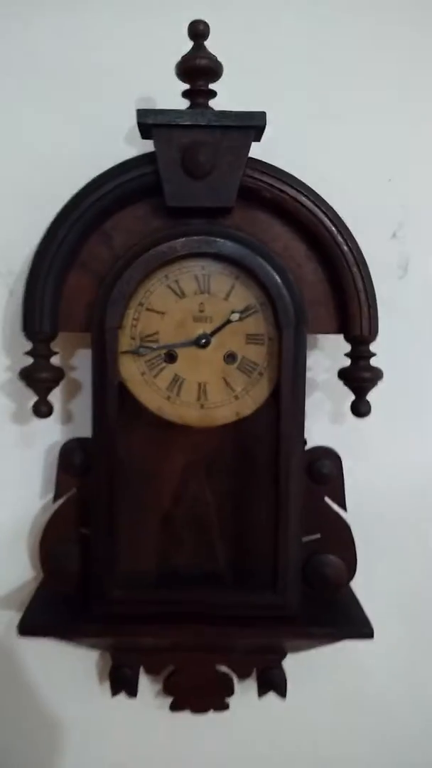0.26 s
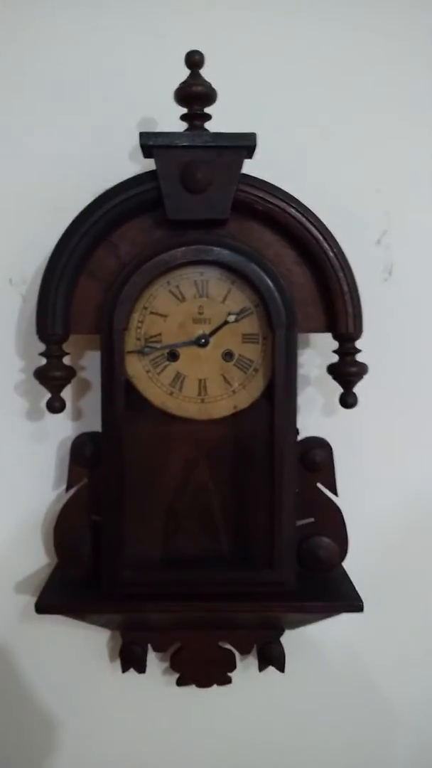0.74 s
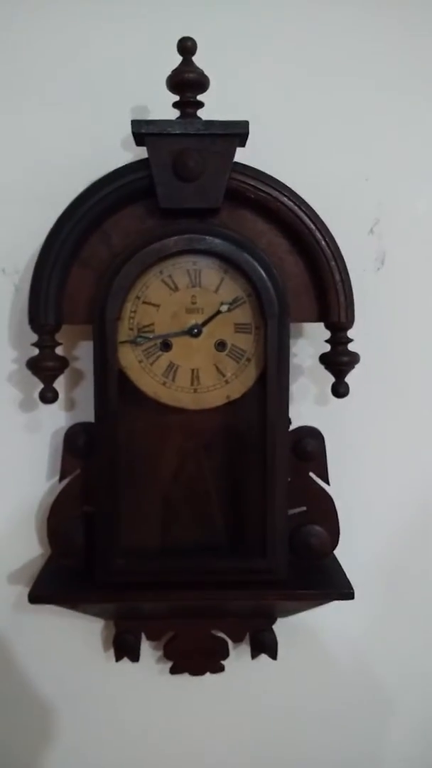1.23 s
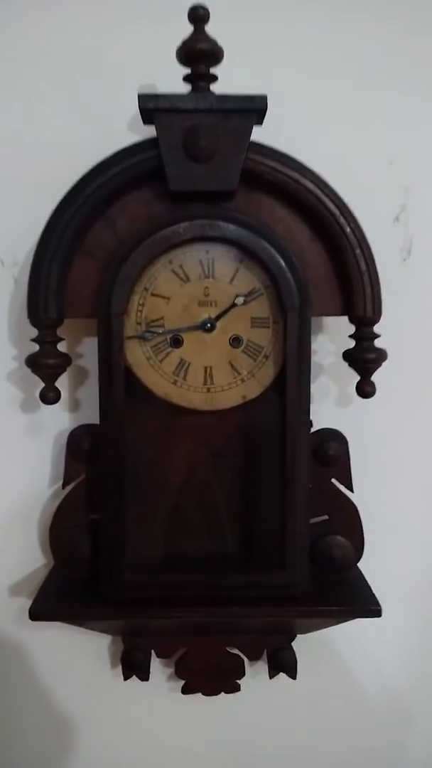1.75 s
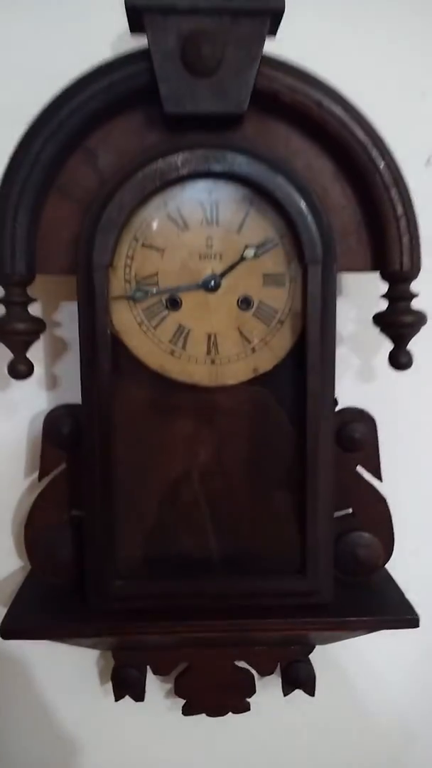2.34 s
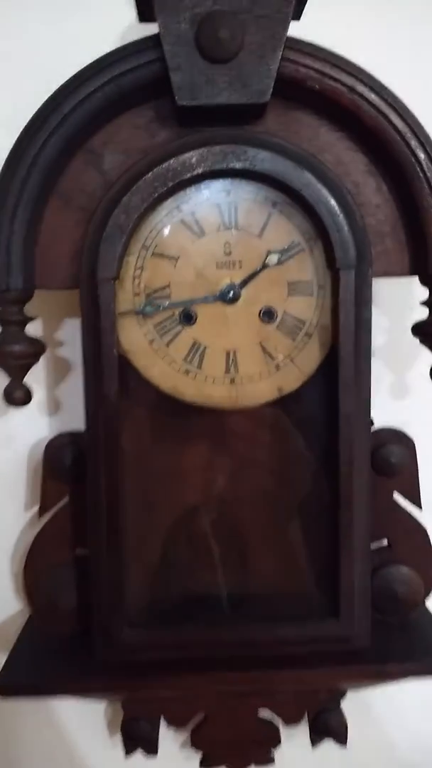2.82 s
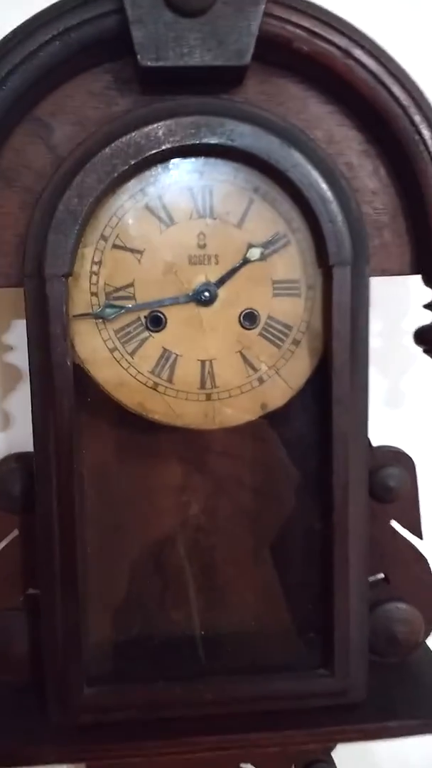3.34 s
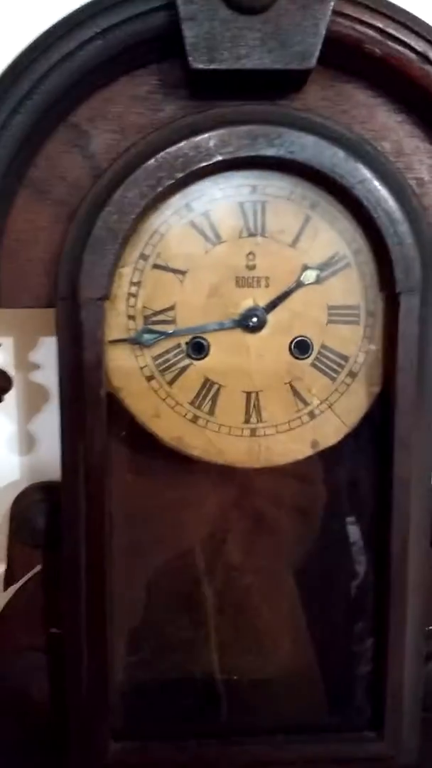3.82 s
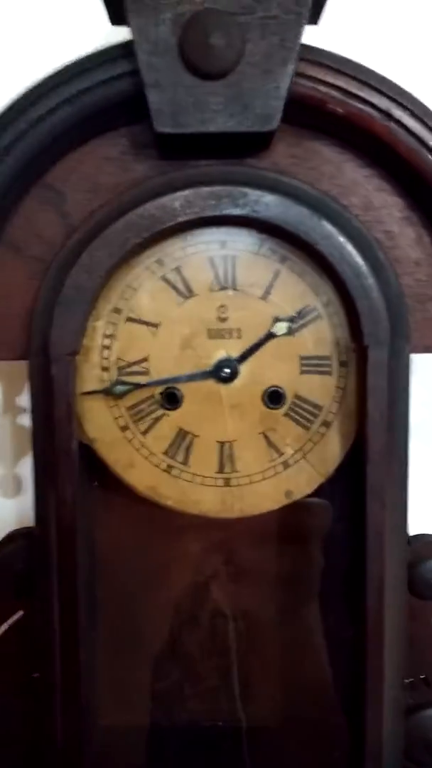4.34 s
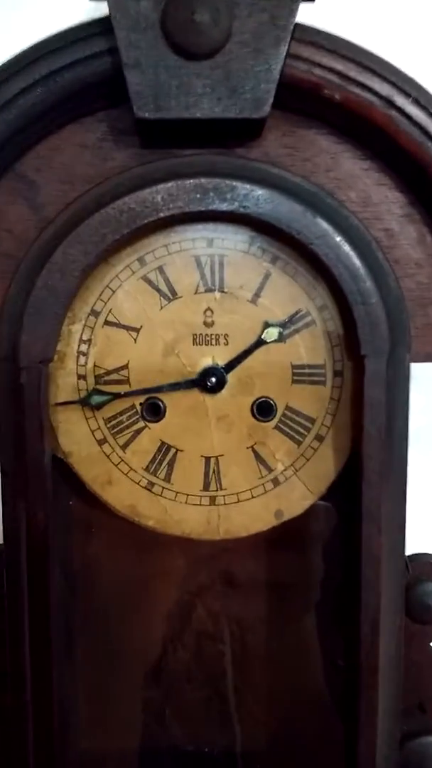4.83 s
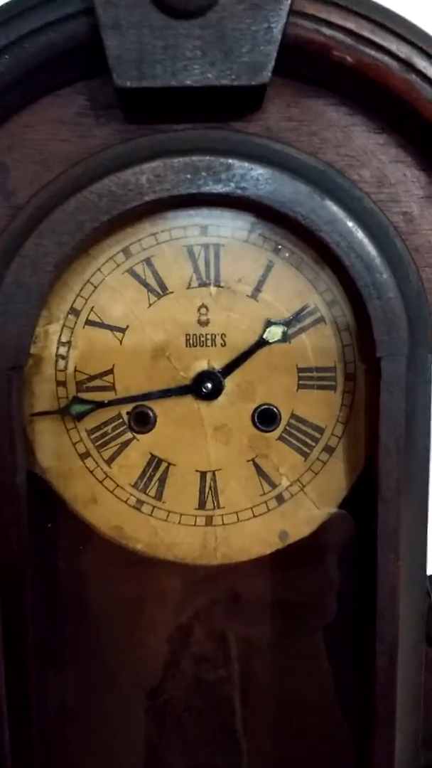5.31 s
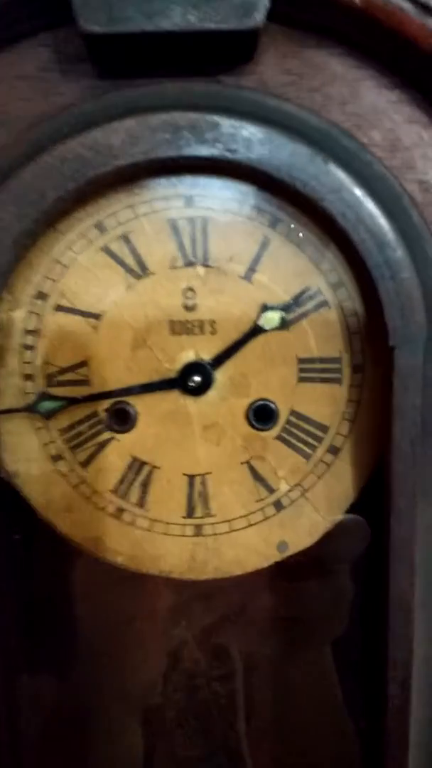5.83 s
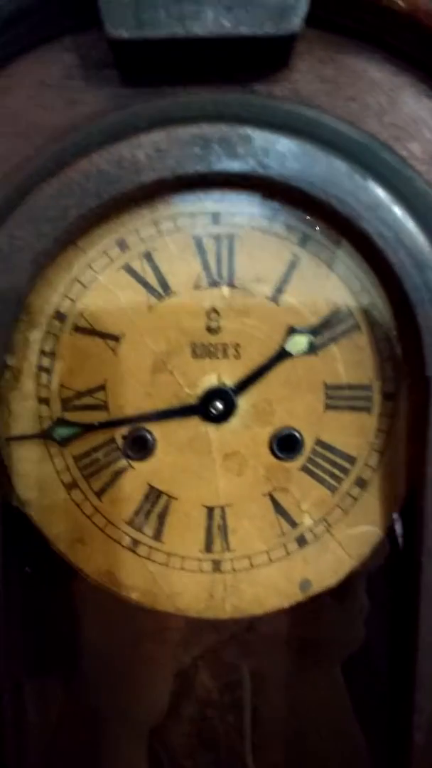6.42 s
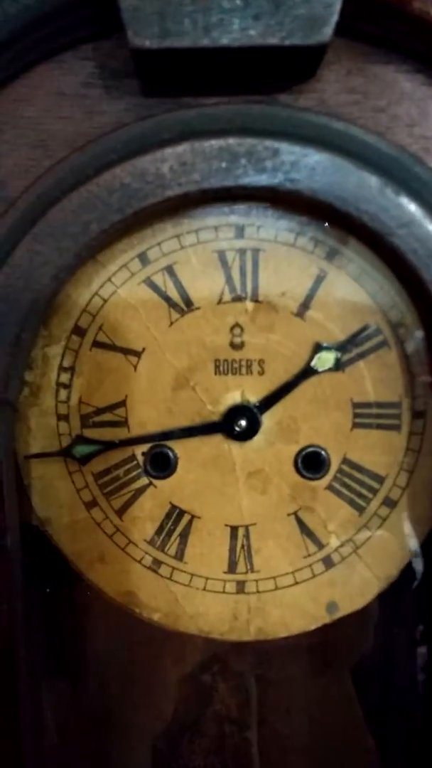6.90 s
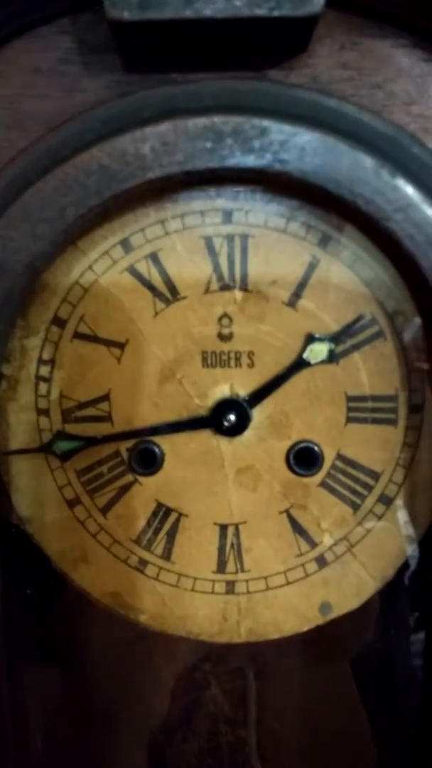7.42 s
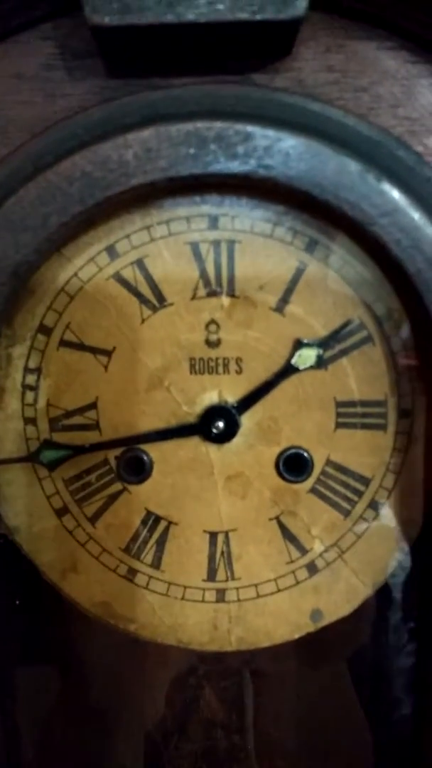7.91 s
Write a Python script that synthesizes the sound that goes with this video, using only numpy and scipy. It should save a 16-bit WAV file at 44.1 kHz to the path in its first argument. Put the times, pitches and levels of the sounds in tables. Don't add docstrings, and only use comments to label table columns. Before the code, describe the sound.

A wooden wall clock ticks steadily in a quiet room, dull case knocks around each bright tick, with one very loud plastic snap midway.

```python
import sys
import numpy as np
from scipy import signal
from scipy.fft import rfft, irfft, next_fast_len
from scipy.io import wavfile
from scipy.ndimage import uniform_filter1d, map_coordinates

SR = 44100
rng = np.random.default_rng(int(sys.argv[2]) if len(sys.argv) > 2 else 0)


def level_to_linear(level):
    exponent = np.asarray(level, float) / 20
    return 10 ** exponent


def output_pcm(signal):
    pcm = np.clip(np.atleast_2d(signal).T, -1, 1) * 32767
    wavfile.write(sys.argv[1], SR, np.round(pcm).astype(np.int16))


N = 359856

# start_s, peak_db, tilt_db_per_octave
TICKS = [(0.3681, -36, 2), (0.901, -41, 5), (1.434, -37, 1.5), (1.968, -36.5, 2), (2.5009, -35, 2.5),
         (3.035, -34.5, 2.5), (3.569, -37, 0.5), (4.103, -40, 0.5), (4.6438, -38, 2.5),
         (5.1772, -34.5, 1.5), (5.7134, -35, 4.5), (6.2489, -32.5, 5), (6.7843, -32, -0.5),
         (7.318, -32.5, 2), (7.854, -32.5, 1.5)]
# start_s, peak_db, tilt_db_per_octave
TOCKS = [(0.077, -37, -1.5), (0.609, -39, 0.5), (1.1446, -35.5, 1.5), (1.678, -38, 1), (2.2117, -34.5, 3),
         (2.7444, -35, -3.5), (3.28, -34, -1), (3.8154, -45.5, 0), (4.3511, -37, -1.5),
         (4.8865, -33.5, -2.5), (5.419, -32.5, -0.5), (5.957, -33, -3), (6.4917, -32, 0),
         (7.025, -32, -2.5), (7.5588, -33, -2), (8.091, -32, -3)]
# centre_hz, width_hz, level_db
TICK_PLATES = [(455, 310, 7), (1660, 1760, 2), (2780, 500, 4.5), (3434, 275, 2), (4730, 1230, -1),
               (6100, 2140, -12), (8600, 1700, -11.5)]
# centre_hz, width_hz, level_db
TOCK_PLATES = [(500, 1460, -7), (1660, 250, 6), (2240, 440, 2), (3360, 620, 2.5), (4170, 1200, 2.5),
               (6240, 1850, -0.5), (8640, 2800, -7)]
# release_s, release_db, push_db, landing_db
TICK_KNOCKS = [(.294, -30, -31, -32.5), (.828, -33.5, -32, -32.5), (1.362, -33, -31.5, -33),
               (1.896, -34, -32.5, -32), (2.43, -30, -30, -29), (2.963, -32.5, -29, -30),
               (3.499, -33, -34, -33.5), (4.034, -35.5, -37, -33.5), (4.569, -29.5, -30.5, -27.5),
               (5.103, -28, -30.5, -24.5), (5.638, -28, -30, -26), (6.177, -30, -28, -26.5),
               (6.709, -28.5, -25.5, -31.5), (7.242, -26, -27.5, -31.5), (7.777, -29, -29.5, -26)]
# release_s, release_db, push_db, landing_db
TOCK_KNOCKS = [(0.013, -33.5, -40, -34), (.546, -31, -33, -34), (1.08, -32, -50, -36),
               (1.613, -30.5, -37, -33), (2.148, -29, -41, -33.5), (2.68, -29.5, -32, -31.5),
               (3.216, -28.5, -42, -36), (3.75, -58, -50, -43), (4.272, -32, -40, -38.5),
               (4.821, -27, -51, -38), (5.339, -26.5, -32.5, -34), (5.873, -31, -34, -36),
               (6.407, -29.5, -32, -45), (6.961, -26.5, -34.5, -34), (7.495, -27.5, -33.5, -40),
               (8.028, -26, -42, -35)]
# start_s, peak_db
REBOUNDS = [(0.708, -46), (2.368, -39), (2.787, -32), (3.695, -40), (5.255, -36), (5.802, -38),
            (6.356, -39), (7.13, -44), (7.605, -45), (8.132, -45)]
# centre_hz, width_hz, level_db
CASE = [(707, 72, -5), (906, 79, -1), (1058, 71.7, 8), (1333, 35, 3), (1480, 110, -7)]
# start_s, peak_db, recoil_db
SNAPS = [
    (3.7256, -0.4, -1.5),
    (3.7297, -28, 1),
    (3.738, -46, -8),
]
# centre_hz, width_hz, level_db
SHELL = [(6900, 4800, 0)]
# centre_hz, width_hz, level_db
GRIP = [(2820, 7300, 0.5), (686, 94, 9), (300, 360, 2.5)]
# start_s, peak_db, centre_hz, width_hz
CREAKS = [
    (3.7731, -27, 700, 2500),
    (3.8751, -26.5, 400, 600),
    (3.8765, -37, 800, 500),
    (3.875, -37, 7000, 9000),
    (4.08, -50, 45, 60),
    (4.847, -22.5, 7500, 9000),
    (4.9983, -25, 3850, 1200),
    (3.7115, -38, 7000, 9000),
    (2.068, -33, 1500, 700),
]
# centre_s, half_length_s, rms_db
RUSTLES = [
    (7.738, 0.065, -49),
    (7.904, 0.05, -47.5),
]
# time_s, hiss_db
GAIN = [(0, -58.5), (.29, -57), (.95, -61), (1.41, -57.5), (1.77, -60.5), (2.45, -57.5), (2.93, -59.5),
        (3.2, -58.5), (3.73, -59), (3.86, -67.5), (4.09, -62.5), (4.27, -62.5), (4.86, -58), (5.5, -58.5),
        (5.95, -58), (7.41, -59), (7.73, -58.5), (8.16, -58.5)]
# centre_s, half_length_s, level_db
DUCK = (3.7335, .005, -14)
# frequency_hz, density_db_per_hz
RUMBLE = [(20, -61), (50, -5.5), (100, -12), (150, 2.5), (250, -0.5), (400, -4), (700, -6.5), (1100, -7),
          (1600, -8.5), (2500, -7), (4000, -19), (8000, -40)]
# centre_hz, width_hz, level_db
HUMS = [(90.6, 10.6, 16.5)]
# centre_hz, width_hz, first_db, last_db
DRONES = [(145, 41, -3.5, -4.5), (247, 13, -17, 1.5), (465, 39, -5.5, -8.5), (770, 110, -6.5, -6.5)]
# centre_s, half_length_s, drone_hz, level_db
SWELLS = [(1.415, 0.28, 465, 5), (1.41, .12, 247, -1), (2.19, 0.058, 247, 11), (2.747, 0.11, 247, 3),
          (3.3, .1, 247, 10), (3.677, 0.095, 247, 13.5), (3.675, 0.072, 465, 10), (3.68, .1, 145, 5.5),
          (5.2, 0.23, 247, 4.5), (6.3, 0.29, 247, 5.5), (6.646, 0.063, 145, 7), (7.114, 0.21, 145, 7),
          (3.15, 0.3, 465, -8), (2.92, .08, 145, -15)]
# time_s, pitch_hz, level_db
PIPE = [
    [(3.42, 770, -56.5), (3.56, 750, -75), (3.62, 725, -48.5), (3.71, 725, -63), (3.76, 790, -65),
     (3.87, 839, -58)],
    [(6.83, 776, -73), (6.89, 776, -50), (6.96, 770, -57), (7.03, 777, -56)],
]
# frequency_hz, likeness
ALIKE = [(40, 0.079), (80, 0.7), (150, 0.81), (300, 0.68), (600, 0.6), (1200, 0.31), (2500, -0.034)]
# frequency_hz, density_db_per_hz
BACK_HISS = [(500, -11), (2000, -21), (4000, -7.5), (5000, -8), (6500, -3.5), (7600, 1.5), (8300, -3.5),
             (9000, -4.5), (11500, -2.5), (12800, -4.5), (13700, -10.5), (14500, -1.5), (15500, -9.5)]
# frequency_hz, density_db_per_hz
FRONT_HISS = [(500, -37), (2000, -23), (4000, -11.5), (5000, -6.5), (6500, -20), (8000, -12.5),
              (10000, -15), (13000, -27), (15500, -25)]
# pitch_hz, level_db
WHINES = [(8003, -15), (9657, -20)]
# start_s, end_s, level_db
BUSY_WHINE = [(-.1, 0.062, -71), (.27, 1.0, -70), (1.37, 2.9, -72.5), (3.243, 3.52, -75), (4.57, 5.46, -74),
              (6.8, 7.2, -71)]
# frequency_hz, level_db
CROSS = [(100, -3), (700, -4), (1900, -4.5), (2800, -1.5), (4000, -5), (4900, -4.5), (6600, -6.5),
         (8600, -3.5), (10500, -12), (14000, -22)]
# frequency_hz, level_db
OVERALL_COLOUR = [(100, 6.5), (300, 4.5), (1000, 2.5), (2500, 0.5), (4000, 1.26), (7000, 0), (15000, -3.1)]

TICK_PUSH_SHARE, TOCK_PUSH_S = 0.56, 0.036
TICK_LAND_S, TOCK_LAND_S = 0.001206, 0.00353
TICK_LOSS_DB, TOCK_LOSS_DB, REBOUND_LOSS_DB = (-4, -5.5, -7.5), (-7.5, -6, -3), -4.5
BOUNCE_S, BOUNCE_SPREAD = 0.008, 0.0962
RAGGED_DB = 4
VARIED_DB = 2.5
FRONT_LATE_S, FRONT_DB = 0.00008, -0.2
RUMBLE_DB = 6.5
WHINE_HZ, WHINE_IDLE_DB, WHINE_EDGE_S = 13008, -82, 0.04
CROSS_S, TOP_HZ = 0.0004138, 15520


def locks():
    track = np.zeros((2, N))
    for events, plates in (TICKS, TICK_PLATES), (TOCKS, TOCK_PLATES):
        for s, db, tilt_db in events:
            ragged_db = RAGGED_DB * rng.standard_normal(SR // 400 + 1).repeat(repeats=100)[:SR // 4]
            tail = level_to_linear(-13.5 + ragged_db) * rattle(0.088, attack=0.0025)
            crack = (rattle(0.0064, attack=0.00039) + tail) * level_to_linear([[0], [-5]])
            scattered = level_to_linear(-9.0) * rattle(0.032, attack=0.00058, channels=2)
            echo = level_to_linear(-15) * rattle(0.17, attack=0.004, channels=2)
            ring = body(varied(plates))
            colour = lambda f: ring(f) * level_to_linear(tilt_db * np.log2(f / 3500 + 0.033))
            add(track, s, db + 5, filtered(crack + scattered + echo, colour))
    return track


def knocks():
    track = np.zeros((2, N))
    for s, db, loss_db in blows():
        gap_s = BOUNCE_S * np.exp(BOUNCE_SPREAD * rng.standard_normal())
        chatter = 0
        for k in range(4):
            bounce = np.roll(contact(), round(k * gap_s * SR))
            chatter = chatter + level_to_linear(k * min(loss_db, 0)) * bounce
        echo = level_to_linear(-30.5) * rattle(0.34, attack=0.03, channels=2)
        add(track, s - 0.001, db - 7.0, filtered(chatter + echo, body(varied(CASE))))
    return track


def blows():
    rows = [(s, db, REBOUND_LOSS_DB) for s, db in REBOUNDS]
    for (lock_s, *_), (release_s, *levels) in zip(TICKS, TICK_KNOCKS):
        push_s = lock_s - TICK_PUSH_SHARE * (lock_s - release_s)
        rows += zip((release_s, push_s, lock_s + TICK_LAND_S), levels, TICK_LOSS_DB)
    for (lock_s, *_), (release_s, *levels) in zip(TOCKS, TOCK_KNOCKS):
        push_s = lock_s - TOCK_PUSH_S
        rows += zip((release_s, push_s, lock_s + TOCK_LAND_S), levels, TOCK_LOSS_DB)
    return rows


def contact():
    grit = level_to_linear(-19) * rattle(0.012, attack=0.0004)
    return grit + np.eye(1, grit.shape[1], 20)


def rattle(t60, attack, channels=1):
    t = np.arange(SR // 4) / SR
    envelope = level_to_linear(-60 * t / t60) * (1 - np.exp(-t / attack))
    return rng.standard_normal((channels, len(t))) * envelope


def snaps():
    track = np.zeros((2, N))
    blow = np.eye(1, SR // 20, 1)[0]
    flex = lambda f: body(SHELL)(f) ** 2 / (1 + (1j * f / 12000) ** 2 + 1j * f / 11000)
    thud = lambda f: body(GRIP)(f) / (1 + 1j * f / 6000)
    for s, db, recoil_db in SNAPS:
        add(track, s, db, filtered(np.diff(blow), flex) * level_to_linear([[-40], [0]]))
        add(track, s + 0.00012, db + recoil_db, filtered(-blow, thud) * level_to_linear([[-25], [0]]))
    return track


def creaks():
    track = np.zeros((2, N))
    for s, db, hz, width in CREAKS:
        ring = lambda f: body([(hz, width, 0)])(f) ** 2
        add(track, s, db, filtered(contact(), ring) * level_to_linear([[-25], [0]]))
    return track


def rustles():
    track = np.zeros((2, N))
    uneven = level_to_linear(3.6 * rng.standard_normal(N // 64 + 1)).repeat(repeats=64)[:N]
    grit = rng.standard_normal(N) * uneven
    cloth = unit(filtered(grit, body([(8250, 5900, 0)])))
    track[1] = cloth * sum(level_to_linear(db) * bump(s, half) for s, half, db in RUSTLES)
    return track


def house():
    sound = rumble() + drones()
    sound[0] += pipe()
    return diffuse(sound)


def rumble():
    z = signal.stft(rng.standard_normal((2, N)), nperseg=2048)[2]
    field = uniform_filter1d(rng.standard_normal(z.shape[1:]), size=4, axis=0)
    field = uniform_filter1d(field, size=8, axis=1)
    patchy = signal.istft(z * level_to_linear(1.33 * unit(field)), nperseg=2048)[1][:, :N]
    hum = lambda f: 1 + sum(level_to_linear(db) / (1 + (2 * (f - c) / w) ** 2) for c, w, db in HUMS) / 2
    noise = unit(filtered(patchy, lambda f: level_to_linear(along(RUMBLE, f)) * hum(f)))
    return level_to_linear(curves(GAIN)[0] + RUMBLE_DB + 0.3 * wobble(4.26)) * noise


def drones():
    sound = np.zeros((2, N))
    for hz, width, first_db, last_db in DRONES:
        swell_db = 0
        for s, half, drone_hz, db in SWELLS:
            if abs(drone_hz / hz - 1) < 0.2:
                swell_db = swell_db + db * bump(s, half)
        level_db = curves(GAIN)[0] + np.linspace(first_db, last_db, N) + swell_db + 2.3 * wobble(4)
        resonance = lambda f: 1 / (1 + (2 * (f - hz) / width) ** 2)
        sound += level_to_linear(level_db) * unit(filtered(rng.standard_normal((2, N)), resonance))
    return sound


def pipe():
    sound = np.zeros(N)
    for rows in PIPE:
        onset = (rows[0][0] - 0.05, rows[0][1], -100)
        end = (rows[-1][0] + 0.062, rows[-1][1], -100)
        hz, db = curves([onset, *rows, end])
        sound += tone(hz, db + 1.5, drift=0.007)
    return sound


def diffuse(x):
    turn = lambda f: np.arccos(np.clip(along(ALIKE, f), -1, 1)) / 2
    mid, side = filtered(x, lambda f: np.array([np.cos(turn(f)), np.sin(turn(f))]))
    return np.array([mid + side, mid - side]) * level_to_linear([[-0.9], [0.9]])


def air():
    colour = lambda f: level_to_linear([along(FRONT_HISS, f), along(BACK_HISS, f)])
    hiss = unit(filtered(rng.standard_normal((2, N)), colour))
    for hz, db in WHINES:
        hiss[1] += tone(hz, db, drift=0.008)
    hiss_db = curves(GAIN)[0] + 5 + 0.17 * wobble(9.4)
    return level_to_linear(hiss_db) * hiss + busy_whine() * level_to_linear([[-20], [0]])


def busy_whine():
    t = np.arange(N) / SR
    busy_db = 0
    for start, end, db in BUSY_WHINE:
        gate = np.clip(np.minimum(t - start, end - t) / WHINE_EDGE_S, 0, 1)
        busy_db = busy_db + (db - WHINE_IDLE_DB) * gate
    return tone(WHINE_HZ, WHINE_IDLE_DB + busy_db + 7 + 1.5 * wobble(6), drift=0.013)


def tone(hz, db, drift):
    return level_to_linear(db) * np.sin(np.cumsum(2 * np.pi * hz / SR + drift * rng.standard_normal(N)))


def body(modes):
    def response(f):
        total = 0
        for k, (c, w, db) in enumerate(modes):
            total = total + (-1) ** k * level_to_linear(db) * 1j * f * w / (c * c - f * f + 1j * f * w)
        return total
    return response


def varied(modes):
    return [(c, w, db + VARIED_DB * rng.standard_normal()) for c, w, db in modes]


def filtered(x, response):
    m = next_fast_len(x.shape[-1] + 8192)
    return irfft(rfft(x, m) * response(np.fft.rfftfreq(m, 1 / SR)), m)[..., :x.shape[-1]]


def add(track, s, db, sound):
    spot = track[..., round(s * SR):][..., :sound.shape[-1]]
    spot += level_to_linear(db) * sound[..., :spot.shape[-1]] / np.max(np.abs(sound))


def unit(x):
    return x / np.sqrt(np.mean(x ** 2) + 1e-20)


def along(points, hz):
    f, v = np.transpose(points)
    return np.interp(np.log(hz + 1), np.log(f + 1), v)


def curves(rows):
    s, *columns = np.transpose(rows)
    return [np.interp(np.arange(N) / SR, s, c) for c in columns]


def bump(s, half):
    return np.exp(-((np.arange(N) / SR - s) / half) ** 2)


def wobble(rate):
    knots = rng.standard_normal(int(N * rate / SR) + 4)
    return map_coordinates(knots, [np.arange(N) * rate / SR])


def scene():
    path = lambda f: np.array([level_to_linear(FRONT_DB) * np.exp(-2j * np.pi * f * FRONT_LATE_S), f ** 0])
    clock = filtered(locks() + knocks(), path)
    handling = snaps() + creaks() + rustles()
    s, half, db = DUCK
    background = (house() + air()) * level_to_linear(db * bump(s, half))
    return clock + handling + background


def band_limit(x):
    return signal.sosfilt(signal.butter(12, 16590, fs=SR, output="sos"), x)


def record(dry):
    late = filtered(dry[::-1], lambda f: level_to_linear(along(CROSS, f)) * np.exp(-2j * np.pi * f * CROSS_S))
    wide = filtered(dry - late, lambda f: level_to_linear(along(OVERALL_COLOUR, f))) * level_to_linear([[-0.4], [0.4]])
    limited = np.clip(wide, -1, 1)
    return band_limit(filtered(limited, lambda f: f < TOP_HZ))


dry = scene()
out = record(dry)
output_pcm(out)
```